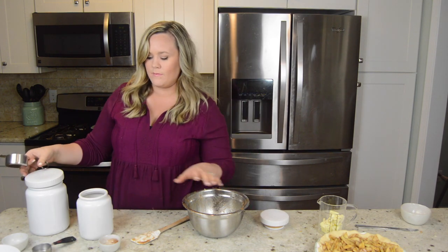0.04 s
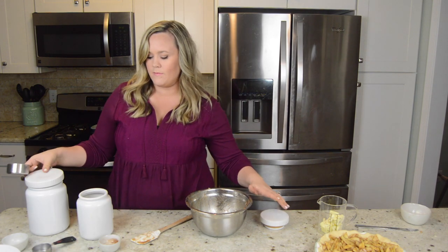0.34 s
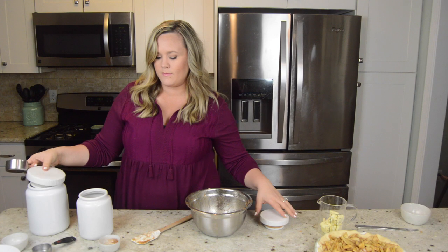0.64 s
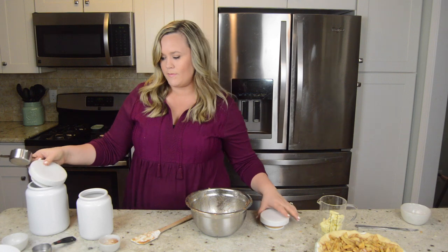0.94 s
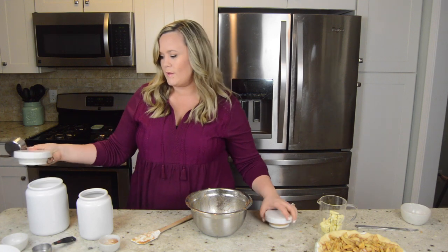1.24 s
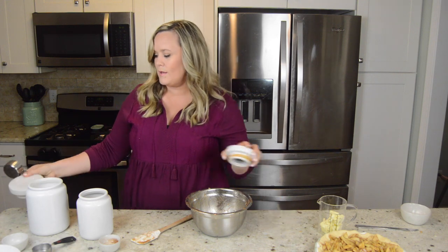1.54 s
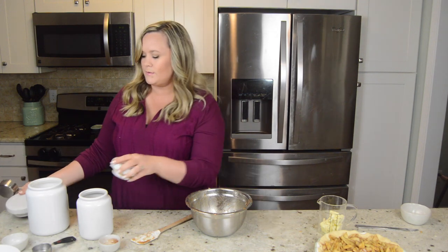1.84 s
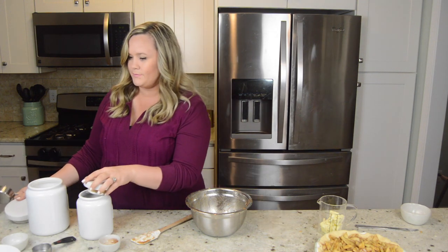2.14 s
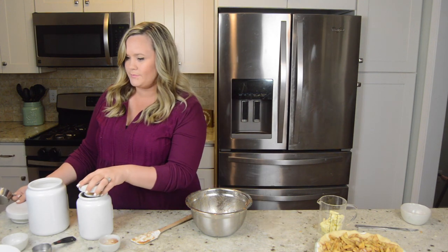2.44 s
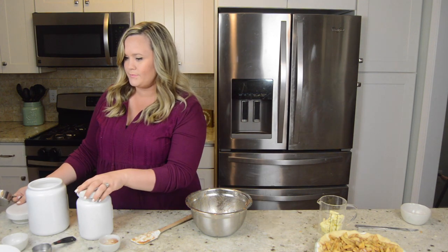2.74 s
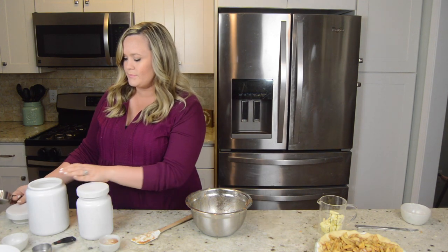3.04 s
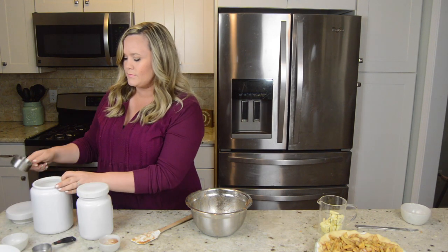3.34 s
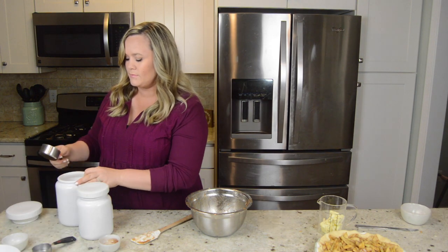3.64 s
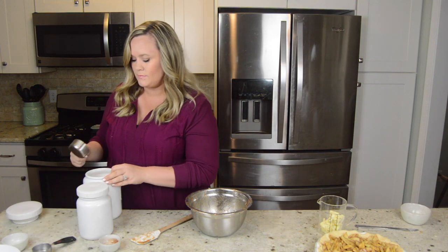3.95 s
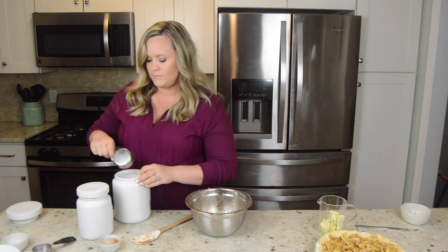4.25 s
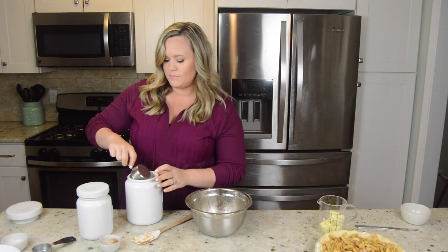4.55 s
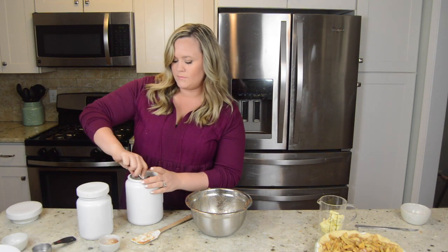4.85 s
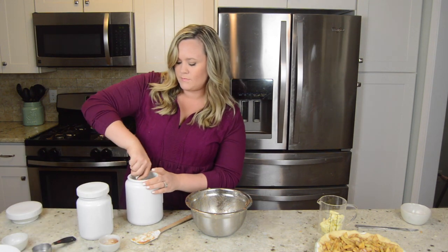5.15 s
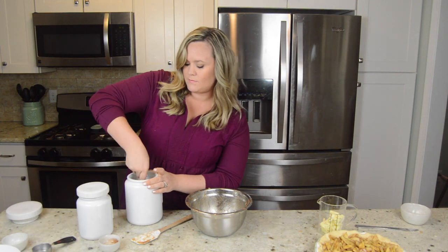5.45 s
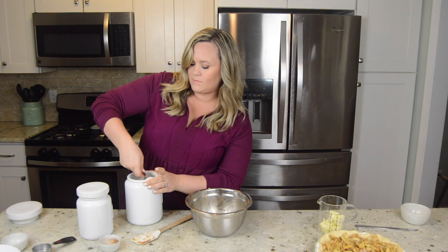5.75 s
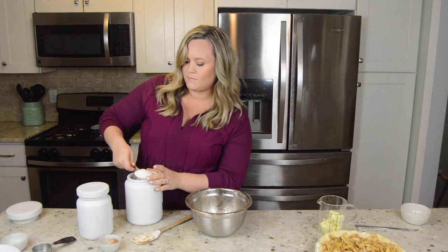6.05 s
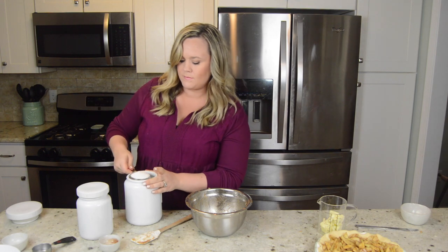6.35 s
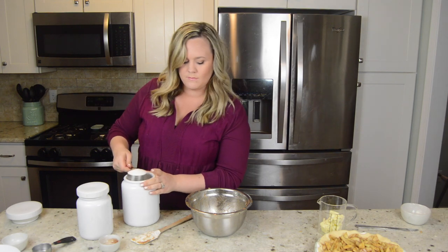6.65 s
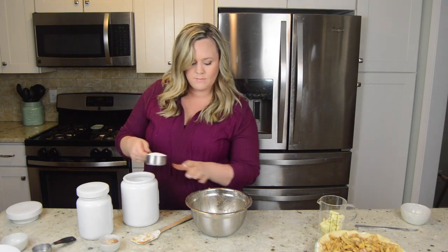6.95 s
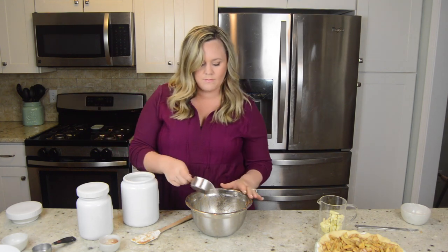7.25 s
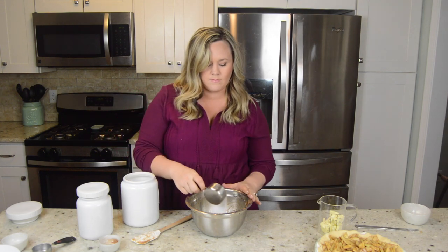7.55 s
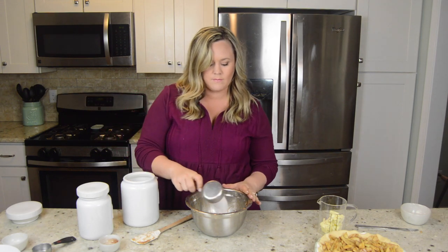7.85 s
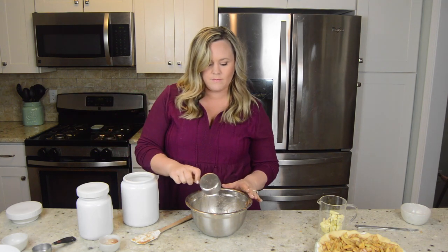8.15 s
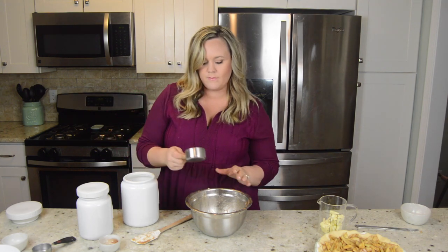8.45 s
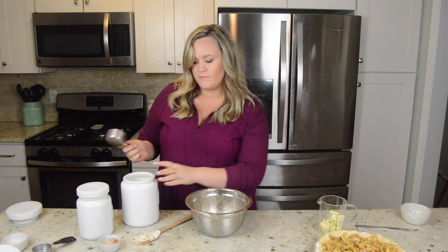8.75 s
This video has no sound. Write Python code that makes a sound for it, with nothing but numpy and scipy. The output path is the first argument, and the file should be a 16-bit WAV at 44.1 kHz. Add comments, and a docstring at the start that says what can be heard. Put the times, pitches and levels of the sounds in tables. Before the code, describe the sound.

A low, steady ventilation hum fills a kitchen whose hard walls give each contact a short echo. A steel measuring cup rings lightly at the start, then clinks sharply against a ceramic canister at 0.3 seconds, with a thump on the counter. A lid rattles around 0.7 seconds. At 2.2 seconds a lid is set down with a loud clatter that slightly overloads the microphone. Soft scuffs lead into another bright lid clink at 2.8 seconds. The cup ticks faintly from 3.2 to 4.5 seconds, knocks sharply on a canister at 4.9, and digs into sugar with a quiet, gritty crunch until about 5.8. Several light, damped taps level it around 6.4 to 6.6 seconds. From 7.2 to 8.1 seconds sugar patters faintly into a steel bowl and slips out in brief hisses. A last tiny metal tick comes at 8.6 seconds.

```python
"""The lids of two ceramic canisters clink off and on in a kitchen, and a steel measuring cup rings along.
The cup strikes a canister, digs into sugar, is tapped level on the rim and emptied into a steel bowl.
Each contact is a clack plus damped modes; the sugar is a stream of tiny impacts.
Hard walls answer every contact over a low ventilation hum; the loudest clinks overload the microphone."""
import sys
import numpy as np
from scipy import signal
from scipy.fft import rfft, irfft, next_fast_len
from scipy.io import wavfile

SR = 44100
rng = np.random.default_rng(int(sys.argv[2]) if len(sys.argv) > 2 else 0)


def wrap_up_sound(samples):
    """Save the sound to the file named by the first command line argument, as 16-bit audio."""
    columns = np.atleast_2d(samples).T
    # keep every value between -1 and 1, then stretch to whole-number steps
    tamed = np.clip(columns, -1, 1)
    steps = np.round(tamed * 32767).astype(np.int16)
    wavfile.write(sys.argv[1], SR, steps)


N = 388080

# Resonances. Each row: frequency in Hz, level in dB, t60 in seconds.
CANISTER_MODES = [(1566, -8, 0.041), (1670, -5.5, 0.015), (1680, 4, 0.018), (1796, -7, 0.047),
                  (2132, -5, 0.054), (2200, -14.5, 0.25), (3170, -9.5, 0.0082), (3824, -14.5, 0.016),
                  (4240, -19, 0.11), (5100, -12.5, 0.022), (5230, -11.5, 0.037), (7920, -17.5, 0.041),
                  (9060, -15.5, .04), (10050, -22, 0.082)]
BIG_LID_MODES = [(595, -11, 0.039), (1462, -18.5, 0.029), (2115, -18.5, 0.11), (2353, -12, .04),
                 (2395, -5, 0.12), (2420, -12, 0.11), (2486, -14.5, 0.033), (4430, -20.5, .035),
                 (5100, -30, 0.033), (7196, -43.5, 0.11), (8630, -26.5, 0.02)]
SMALL_LID_MODES = [(642, -16.5, 0.045), (1006, -7, 0.024), (2208, -8, .07), (3356, -22, 0.061),
                   (3459, 3.5, 0.136), (6625, -9.5, 0.029), (8870, -18, 0.014), (13850, -34.5, .04)]
COUNTER_MODES = [(233, -13.5, 0.1), (490, -5, 0.029), (573.7, 3.5, 0.024), (633, -14, 0.027)]
# Contact spectra. Each row: frequency in Hz, level in dB.
CANISTER_CLACK = [(30, -39), (250, -16), (500, -8), (700, -0.5), (1000, -18), (1500, -0.5), (2300, 7.5),
                  (2800, -1), (4000, -3.5), (7000, -13), (10000, -8), (15000, -22.5)]
LID_CLACK = [(30, -32), (200, -7), (450, -4), (650, 2), (1000, 2.5), (1400, 0.5), (2200, 5), (3000, -12),
             (5000, -25.5), (9000, -27.5), (15000, -50.5)]
COUNTER_THUD = [(30, -38.5), (100, -5.5), (220, -1), (400, 1), (900, -10.5), (2000, -15.5), (10000, -42.5)]
# Contacts. Each row: start in seconds, ring in dB, clack in dB, tilt in dB per octave.
CANISTER_HITS = [(.3243, -5.5, -14, -0.5), (.5991, -24, -33, -2), (.642, -20.5, -25, 3.5),
                 (.663, -18.5, -27, -8.5), (.7054, -28, -25.5, -2.5), (4.8647, -4.5, -15, -1.5)]
BIG_LID_HITS = [(.645, -38, -17, -1.3), (.7054, -29, -22, 0.25), (.7333, -19.5, -36.5, 0),
                (.7698, -34, -38.5, 0), (2.1773, -23, -26.5, 0.1), (2.179, 0.5, -8.5, -1),
                (2.189, -5.5, -21, -1), (2.2539, -9, -8, 0.23)]
SMALL_LID_HITS = [(2.2539, -16.5, -12, 5), (2.265, -31.5, -27.5, 6), (2.7722, -12.5, -13, 2),
                  (2.793, -4.5, -15.5, -2.5), (2.801, -13, -13, 3.5)]
COUNTER_HITS = [(.3745, -1.4, -16.5, 0.99)]


def canisters():
    """A canister is knocked, the lids clink and the counter thumps."""
    body = struck(CANISTER_HITS, CANISTER_MODES, CANISTER_CLACK, clack_t60_s=0.0073, wet_db=-3.5)
    big_lid = struck(BIG_LID_HITS, BIG_LID_MODES, LID_CLACK, clack_t60_s=0.04, wet_db=-3)
    small_lid = struck(SMALL_LID_HITS, SMALL_LID_MODES, LID_CLACK, clack_t60_s=0.03, wet_db=-3.5)
    counter = struck(COUNTER_HITS, COUNTER_MODES, COUNTER_THUD, clack_t60_s=0.061, wet_db=-3.5)
    return body + big_lid + small_lid + counter


# Steel resonances. Each row: frequency in Hz, level in dB, t60 in seconds.
CUP_MODES = [(2270, -8, .14), (4256, -1, 0.13), (5896, -9, .08), (6860, -5.5, 0.11), (7340, -12, .16),
             (8000, -5, 0.22), (8810, -10.5, .12), (9710, -14, 0.085), (10040, -12.5, .12),
             (11350, -15.5, .08), (11690, -12.5, .08), (12340, -17, .14), (13030, -15, 0.11),
             (14300, -14.5, .1)]
RIM_MODES = [(2195, 1, .07), (2235, 2, .12), (2380, -6, .07), (3327, -12, .12), (3900, -8, .06),
             (4264, -9, .16), (4511, -15, .16), (5055, -14, .1), (6240, 0, .09), (6746, -5, .13),
             (8856, -10, .08), (10050, -8, .08), (11650, -20, .12)]
HANDLE_MODES = [(2520, -4.5, 0.11), (4900, -1.5, 0.08), (8000, -10, 0.1), (8839, -22, 0.11),
                (11810, -28, .25)]
# Contact spectrum. Each row: frequency in Hz, level in dB.
STEEL_CLACK = [(30, -34), (250, -15), (700, -20.5), (1000, -7), (1600, 7.5), (2400, 7), (4000, -5.5),
               (7000, -5.5), (10000, -2), (15000, -30.5)]
# Contacts. Each row: start in seconds, ring in dB, clack in dB, tilt in dB per octave.
CUP_HITS = [(1.06, -53, -62, 4), (3.2252, -49.5, -42, 8), (3.801, -54, -49.5, 3), (4.04, -49.5, -43, 4),
            (4.222, -64, -43.5, 10), (4.2391, -44, -47.5, -1.5), (4.4391, -59, -44, 5),
            (4.496, -58, -56.5, 7.5), (4.8647, -36, -37, -7.5), (8.566, -47, -41, 5)]
RIM_HITS = [(.3243, -11.5, -14, 0), (.645, -25.5, -22.5, 0.69), (.7054, -29.5, -44.5, 0.037),
            (2.18, -41, -36.5, 0.012)]
HANDLE_HITS = [(0, -29, -41, 0), (.02, -33.5, -37, 0.91)]


def empty_cup():
    """The empty steel cup rings on wall, rim and handle."""
    wall = struck(CUP_HITS, CUP_MODES, STEEL_CLACK, clack_t60_s=0.027, wet_db=-4, chatter_s=0.018)
    rim = struck(RIM_HITS, RIM_MODES, STEEL_CLACK, clack_t60_s=0.04, wet_db=-3.5)
    handle = struck(HANDLE_HITS, HANDLE_MODES, STEEL_CLACK, clack_t60_s=0.14, wet_db=-0.5)
    return wall + rim + handle


# Sugar-damped resonances. Each row: frequency in Hz, level in dB, t60 in seconds.
FULL_CUP_MODES = [(1565, -2, 0.032), (2804, 7.5, 0.0056), (4500, -3, 0.01), (4940, -7.5, 0.01),
                  (6060, -14, 0.012), (9170, -11.5, 0.0084)]
# Contact spectrum. Each row: frequency in Hz, level in dB.
FULL_CUP_CLACK = [(30, -37), (70, -5), (150, -18), (400, -1), (750, -2), (1200, 5.5), (2000, -2.5),
                  (3000, -19), (3800, -10.5), (4700, -10.5), (7000, -16), (10000, -9), (15000, -31.5)]
# Taps on the rim. Each row: start in seconds, ring in dB, clack in dB, tilt in dB per octave.
LEVELLING_TAPS = [(6.3743, -15.5, -27, 2.5), (6.385, -24, -31, -3.5), (6.4121, -49, -19, -2),
                  (6.5178, -26, -38, 2), (6.5689, -31.5, -20, -0.5), (6.6255, -31.5, -33, -6)]


def full_cup():
    """The full cup sticks and slips up the canister wall, ringing less each time, then is tapped level."""
    lift_s, gap_s = 5.7247, 0.032
    ring_db, loss_db, clack_db, db_per_octave = -37, 5.5, -45, 5
    slips = [(lift_s + k * gap_s, ring_db - k * loss_db, clack_db, db_per_octave) for k in range(4)]
    return struck(slips + LEVELLING_TAPS, FULL_CUP_MODES, FULL_CUP_CLACK, clack_t60_s=0.02, wet_db=-3)


# Bright ticks. Each row: start in seconds, frequency in Hz, level in dB, t60 in seconds.
TICKS = [(.641, 5380, -8.5, 0.019), (0.641, 9160, -11.5, 0.024), (1.7555, 9500, -13.5, 0.0016),
         (1.756, 5900, -29, 0.0033), (2.254, 6620, -9.5, 0.025), (2.7931, 8520, -7.5, 0.025),
         (3.156, 6840, -40, 0.025), (3.2251, 8910, -22.5, 0.035), (4.2392, 8180, -29, 0.044),
         (4.4385, 9800, -35.5, 0.04), (5.8461, 10000, -18, 0.0035)]
# Slides of the cup. Each row: start in seconds, level in dB, length in seconds.
CUP_SLIDES = [(.265, -43.5, 0.046), (3.44, -42, 0.08)]


def handling():
    """Glaze, handle and the small lid's high modes tick, and the cup sings as it slides in the fingers."""
    ticks = np.zeros(N)
    for start_s, hz, db, t60_s in TICKS:
        add(ticks, start_s, amp(db) * ring([(hz, 0, t60_s)]))
    friction = strokes(CUP_SLIDES, rise_s=0.028, fade_db_per_s=100)
    rub = singing_steel(CUP_MODES, friction, rate_hz=2300, rasp_db=-1.5)
    return kitchen(ticks + rub, wet_db=-11)


# Sugar spectra. Each row: frequency in Hz, level in dB.
CRUNCH_SPECTRUM = [(1500, -25), (5000, -8.5), (8500, 4), (12000, 1), (15500, -9)]
DIG_SPECTRUM = [(200, 4), (700, 8.5), (1100, 3.5), (1600, 8.5), (2300, -2.5), (3400, 0.5), (5000, -1.5),
                (6500, -7), (9500, -2), (12000, -13), (15500, -18)]
GRIND_SPECTRUM = [(1200, -23), (2500, -12), (3300, 2), (4200, -5), (7000, -24), (15000, -35)]
POUR_SPECTRUM = [(500, -28.5), (3000, -18), (4500, -13), (6000, -9), (7800, 10), (10000, -3),
                 (15000, -20.5)]
# Sugar movements. Each row: start in seconds, level in dB, length in seconds.
CRUNCHES = [(4.94, -52, 0.15), (5.07, -46.5, 0.098)]  # the crust breaks
DIGS = [(4.89, -50, 0.6), (5.47, -48, 0.22)]  # the cup pushes down, then turns to fill
GRINDS = [(5.5, -53, 0.12)]  # crystals caught between cup and canister
CLUMPS = [(7.35, -61, .05), (7.66, -63.5, .03), (7.84, -57, 0.035), (8.07, -51.5, 0.044)]  # clumps slip out of the cup
LANDINGS = [(7.23, -47.5, 0.011), (7.365, -59, .06)]  # sugar hits bare steel
# Hand-held steel bowl. Each row: frequency in Hz, level in dB, t60 in seconds.
BOWL_MODES = [(3900, -2.5, 0.062), (4360, -1, 0.096), (4760, -1.5, 0.051), (5200, -0.5, 0.065),
              (6050, -6.5, 0.064), (6800, -2, .07), (7640, -2, 0.062), (8360, 2, 0.059), (9500, -2, 0.06),
              (10500, -4, .06), (11800, -9, 0.058)]


def sugar():
    """Crystals crunch as the cup breaks in, grind along its wall, then patter and hiss into the bowl."""
    crunch = coloured(grains(rate_hz=996, spread_db=1.5), CRUNCH_SPECTRUM)
    crunch *= strokes(CRUNCHES, rise_s=0.02, fade_db_per_s=170)
    dig = coloured(grains(rate_hz=3500, spread_db=1.5), DIG_SPECTRUM)
    dig *= strokes(DIGS, rise_s=0.11, fade_db_per_s=73)
    grind = coloured(grains(rate_hz=1500, spread_db=1), GRIND_SPECTRUM)
    grind *= strokes(GRINDS, rise_s=0.11, fade_db_per_s=73)
    pour = coloured(grains(rate_hz=7000, spread_db=0.5), POUR_SPECTRUM)
    pour *= strokes(CLUMPS, rise_s=0.023, fade_db_per_s=260)
    landing = strokes(LANDINGS, rise_s=0.012, fade_db_per_s=300)
    patter = singing_steel(BOWL_MODES, landing, rate_hz=3700, rasp_db=-7.5)
    return kitchen(crunch + dig + grind + pour + patter, wet_db=-4.5)


# Friction swells. Each row: centre in seconds, level in dB, length in seconds, peak in Hz.
SCUFFS = [(0.298, -40.5, 0.035, 300), (2.646, -36.5, 0.032, 675), (2.732, -34.5, 0.041, 208),
          (3.78, -43, 0.05, 342), (4.42, -52.5, 0.097, 70), (5.727, -50.5, 0.076, 222.2)]


def scuffs():
    """Hands and pots brush the counter in soft, dull swells."""
    t, track = np.arange(N) / SR, np.zeros(N)
    for centre_s, db, length_s, hz in SCUFFS:
        spectrum = [(hz / 4, -25), (hz, 0), (hz * 2, -10), (hz * 8, -45), (SR, -70)]
        friction = coloured(rng.standard_normal(N), spectrum)
        swell = np.exp(-(2 * (t - centre_s) / length_s) ** 2)
        track += amp(db) * friction * swell
    return kitchen(track, wet_db=-6)


# Air spectrum and motor tones. Each row: frequency in Hz, level in dB.
AIR_SPECTRUM = [(20, -20.5), (45, -15.5), (75, -11), (100, -6), (150, -5.5), (247, -4), (320, -5.5),
                (485, -1.5), (680, -9.5), (880, -10), (1150, -10), (2200, -18), (8000, -24.5), (15700, -30)]
MOTOR_TONES = [(403.7, -63.5), (613.7, -61.5), (1174, -61)]


def ventilation(air_db=-49, mains_hz=60.3, mains_db=-58.5, fade_from_s=5.6, fade_db_per_s=4):
    """Steady air noise, slightly unsteady motor tones and a mains hum that recedes towards the end."""
    t = np.arange(N) / SR

    def tone(hz):
        drift_s = 0.002 * np.cumsum(rng.standard_normal(N)) / np.sqrt(SR)
        return unit(np.sin(2 * np.pi * hz * (t + drift_s)))

    air = amp(air_db) * coloured(rng.standard_normal(N), AIR_SPECTRUM)
    mains = amp(mains_db - fade_db_per_s * np.maximum(t - fade_from_s, 0)) * tone(mains_hz)
    motor = sum(amp(db) * tone(hz) for hz, db in MOTOR_TONES)
    return air + mains + motor


# Room decay. Each row: frequency in Hz, t60 in seconds.
ROOM_T60 = [(150, 0.59), (400, 0.78), (1000, 0.8), (2700, 0.77), (7000, 0.51), (14000, 0.3)]


def kitchen(x, wet_db, first_wall_s=0.008, early_db=-18):
    """Direct sound, four near reflections and a diffuse tail that dies faster in the treble."""
    hz, t, noise = signal.stft(rng.standard_normal(SR), SR, nperseg=256)
    decay = amp(-60 * t / along(ROOM_T60, hz)[:, None])
    tail = signal.istft(noise * decay, SR, nperseg=256)[1]
    tail *= np.clip(np.arange(len(tail)) / SR / first_wall_s, 0, 1) ** 2
    response = amp(wet_db) * tail / np.linalg.norm(tail)
    delays_s = first_wall_s + rng.uniform(0, 0.02, size=4)
    response[(delays_s * SR).astype(int)] += amp(early_db)
    response[0] += 1
    return signal.fftconvolve(x, response)[:N]


def struck(hits, modes, spectrum, clack_t60_s, wet_db, chatter_s=0):
    """Every contact clacks, rings the object and reaches the room from a new place."""
    track = np.zeros(N)
    for start_s, ring_db, clack_db, db_per_octave in hits:
        sound = amp(ring_db) * ring(modes, db_per_octave)
        knock = amp(clack_db) * clack(spectrum, db_per_octave, clack_t60_s)
        sound[:len(knock)] += knock
        if chatter_s:
            sound = chatter(sound, chatter_s)
        add(track, start_s, kitchen(sound, wet_db))
    return track


def ring(modes, db_per_octave=0, flutter_rad=0.13, attack_s=0.00057, low_cut_hz=170):
    """Damped modes that start together and drift apart; the loose grip makes them flutter."""
    t = np.arange(SR // 3) / SR
    knots_s = np.arange(0, 0.5, 0.004)
    partials = np.zeros(len(t))
    for hz, db, t60_s in modes:
        envelope = amp(db + rng.normal(0, 1) - 60 * t / t60_s) * tilt(hz, db_per_octave)
        flutter = flutter_rad * np.interp(t, knots_s, rng.standard_normal(len(knots_s)))
        partials += envelope * np.cos(2 * np.pi * hz * t + flutter)
    attack = 1 - np.exp(-t / attack_s)
    low_cut = signal.butter(2, low_cut_hz, "high", fs=SR)  # small objects radiate little bass
    return signal.lfilter(*low_cut, partials * attack)


def clack(spectrum, db_per_octave, t60_s, crack_ratio=0.6, size=4096):
    """A sharp crack and a noise burst for the dense modes, with the energy of 5 ms at rms 1."""
    hz, t = np.fft.rfftfreq(size, 1 / SR), np.arange(size) / SR
    burst = rng.standard_normal(size) * amp(-60 * t / t60_s)
    burst[0] = crack_ratio * np.linalg.norm(burst)
    gain = amp(along(spectrum, hz)) * tilt(hz, db_per_octave)
    sound = signal.fftconvolve(burst, minimum_phase(gain, size))
    return sound / np.linalg.norm(sound) * np.sqrt(0.005 * SR)


def tilt(hz, db_per_octave):
    """Harder contacts favour the treble."""
    return amp(db_per_octave * np.log2(np.maximum(hz, 100) / 2500))


def chatter(sound, length_s, count=6):
    """A loose contact repeats a few times in quick succession."""
    strengths = rng.standard_normal(count)
    delays_s = length_s * rng.random(count) ** 2
    touches = np.zeros(SR // 10)
    touches[(delays_s * SR).astype(int)] = strengths
    return signal.fftconvolve(sound, touches / np.linalg.norm(touches))


def singing_steel(modes, force, rate_hz, rasp_db):
    """A stream of tiny impacts keeps steel ringing, with some dry rasp on top."""
    impacts = unit(grains(rate_hz, spread_db=2.5)) * force
    steel = ring(modes)
    rasp = amp(rasp_db) * filtered(impacts, lambda hz: hz > 3500)
    return signal.fftconvolve(impacts, steel / np.linalg.norm(steel))[:N] + rasp


def grains(rate_hz, spread_db):
    """Tiny impulses of random timing and size."""
    sizes = amp(spread_db * np.minimum(rng.exponential(size=N), 3.5))
    occurs = rng.random(N) < rate_hz / SR
    return occurs * rng.standard_normal(N) * sizes


def strokes(rows, rise_s, fade_db_per_s, uneven_db=1.5, catch_hz=70):
    """Gain per sample: each stroke rises, fades after its length and catches unevenly on the way."""
    t, power = np.arange(N) / SR, np.zeros(N)
    for start_s, db, length_s in rows:
        attack = np.clip((t - start_s) / rise_s, 0, 1)
        fade_db = fade_db_per_s * np.maximum(t - start_s - length_s, 0)
        power += (attack * amp(db - fade_db)) ** 2
    catches = np.interp(t * catch_hz, np.arange(SR), rng.standard_normal(SR))
    return np.sqrt(power) * amp(uneven_db * catches)


def amp(db):
    """Decibels to gain."""
    return 10 ** (np.asarray(db) / 20)


def unit(x):
    """Scale to rms 1."""
    return x / np.sqrt(np.mean(x ** 2) + 1e-20)


def along(points, hz):
    """Read (Hz, value) points on a log axis."""
    points_hz, values = np.transpose(points)
    return np.interp(np.log(hz + 1), np.log(points_hz + 1), values)


def filtered(x, response):
    """Filter x by a gain function of frequency."""
    size = next_fast_len(N + SR // 2)
    hz = np.fft.rfftfreq(size, 1 / SR)
    return irfft(rfft(x, size) * response(hz), size)[:N]


def coloured(x, spectrum):
    """Give x a spectrum and rms 1."""
    return unit(filtered(x, lambda hz: amp(along(spectrum, hz))))


def minimum_phase(gain, size):
    """The causal impulse response of a gain curve."""
    cepstrum = irfft(np.log(gain + 1e-6))
    cepstrum[1:size // 2] *= 2
    cepstrum[size // 2 + 1:] = 0
    return irfft(np.exp(rfft(cepstrum)))


def add(track, start_s, sound):
    """Mix a sound into the track."""
    start = round(start_s * SR)
    track[start:start + len(sound)] += sound[:N - start]


def scene():
    """All sources at one microphone."""
    contacts = canisters() + scuffs() + empty_cup() + full_cup() + handling()
    return (contacts + sugar() + ventilation())[None]


def record(dry):
    """The loudest peaks clip softly at full scale, then the band is limited."""
    top_hz = 15900
    clipped = dry[0] / (1 + np.abs(dry[0]) ** 8) ** (1 / 8)
    return filtered(clipped, lambda hz: hz < top_hz)[None]


dry = scene()
out = record(dry)
wrap_up_sound(out)
```